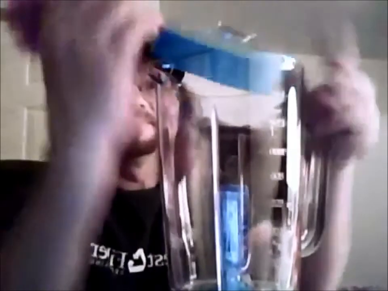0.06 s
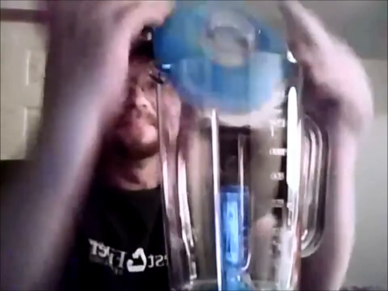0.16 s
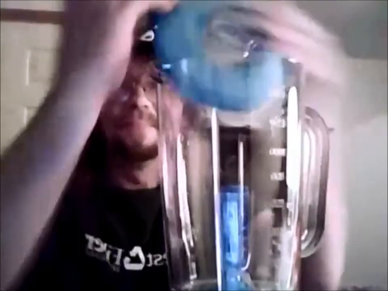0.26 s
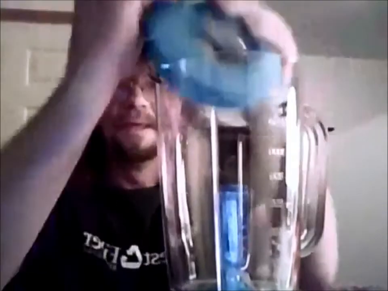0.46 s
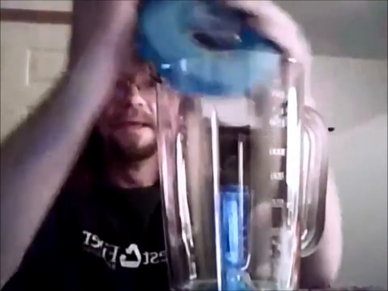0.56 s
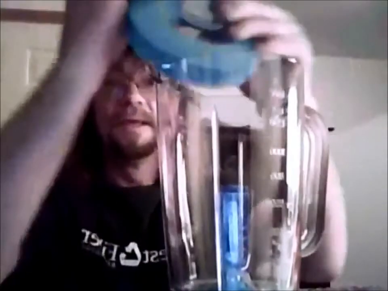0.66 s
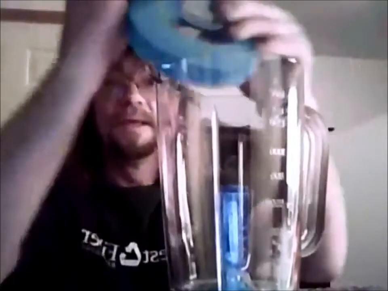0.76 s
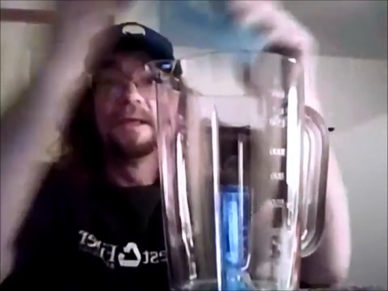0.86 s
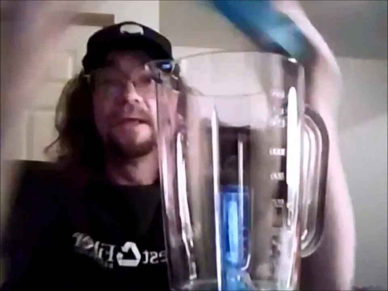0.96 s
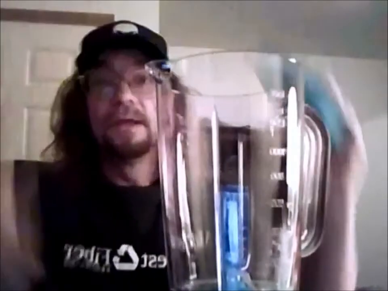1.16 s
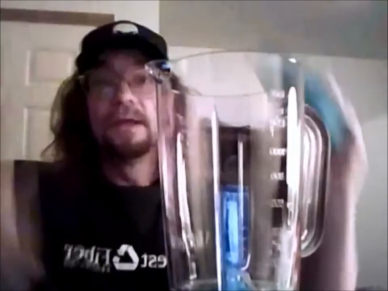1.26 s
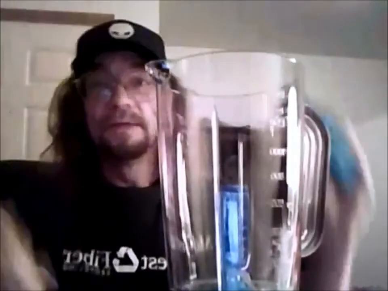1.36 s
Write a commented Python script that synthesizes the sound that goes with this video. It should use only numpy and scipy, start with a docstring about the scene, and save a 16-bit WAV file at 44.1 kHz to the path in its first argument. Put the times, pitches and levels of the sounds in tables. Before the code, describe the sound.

A plastic lid is pulled off a glass blender jar with clicks and a hollow thump.

```python
"""A light click and a faint rub sound over a low hum: a plastic lid is worked off a glass blender jar.
The seal slips by friction, then lets go with a crack and a hollow thump of the air inside.
The rim chatters over the glass, exciting its modes briefly, and taps it a few more times as it lifts.
The handling rumbles through the table, and the room adds a short reverberation to the close sound."""
import sys
import numpy as np
from scipy import signal
from scipy.fft import rfft, irfft, next_fast_len
from scipy.io import wavfile
from scipy.ndimage import uniform_filter1d

SR = 44100
rng = np.random.default_rng(int(sys.argv[2]) if len(sys.argv) > 2 else 0)


def wav_out(sig):
    """Save sig, one row per channel (or a flat mono array), as 16-bit PCM at SR to the path in sys.argv[1]."""
    wavfile.write(sys.argv[1], SR, np.round(np.clip(np.atleast_2d(sig).T, -1, 1) * 32767).astype(np.int16))


N = 61739
FFT_SIZE = next_fast_len(2 * N)
FREQS = np.fft.rfftfreq(FFT_SIZE, 1 / SR)
T = np.arange(N) / SR

# Partials of the hum. Each row: frequency in Hz, rms level in dB.
HUM_PARTIALS = [(78.5, -55.5), (119.5, -64), (240, -67.5), (360, -70)]
# Spectrum of the room noise. Each row: frequency in Hz, relative density in dB.
NOISE_SPECTRUM = [(20, -7.5), (32, -7), (52, -11.5), (80, -13), (130, -8), (200, -11), (300, -21),
                  (600, -19), (900, -28), (2400, -34.5), (4500, -42), (10400, -53.5), (12000, -71)]
# Hard contacts of lid and jar. Each row: start in seconds, relative levels of clack and snap in dB,
# cut-off in Hz (lower for a softer contact).
CONTACTS = [(.001, -42, -37.5, 5000), (.101, -45.5, -44, 4500), (.172, -47.5, -52, 6000),
            (.2025, -30.5, -35, 2800), (.209, -34, -35, 6000), (.219, -30, -37, 5000),
            (.256, -46, -39.5, 4000), (.3275, -21.5, -22.5, 11000), (0.3304, -13.5, -13, 7410),
            (.3335, -20.5, -17.5, 9000), (.3395, -28, -34.5, 9000), (.359, -37, -25.5, 8000),
            (.411, -37.5, -39, 6000), (.457, -22, -28.5, 9000), (.4587, -17.5, -22.5, 14000),
            (.4625, -28, -39, 9000), (.4685, -38, -50, 7000), (.4835, -28.5, -51, 4500),
            (.497, -21.5, -32, 6000), (.503, -23, -27, 9000), (.506, -22, -27, 7000),
            (.5145, -31.5, -29.5, 12000), (.517, -29, -29, 7000), (.532, -24.5, -34, 5000),
            (0.5761, -30.5, -30, 4830), (0.6747, -30, -52, 2470), (.678, -32.5, -48.5, 2600),
            (.7105, -40, -45, 4500), (0.7804, -30, -36.5, 4800), (.790, -32, -38.5, 4000),
            (.810, -33.5, -42, 3500), (0.8224, -32, -44, 4000)]
# Spectra of the plastic's midrange clack and treble snap. Each row: frequency in Hz, relative level in dB.
CLACK_SPECTRUM = [(100, -37.5), (400, -16), (620, -14), (780, -4.5), (870, -8), (1000, -4), (1600, -6),
                  (2450, 2), (2950, -17), (4000, -26.5), (11000, -56.5)]
SNAP_SPECTRUM = [(300, -45.5), (1800, -10), (3200, 4.5), (5200, 2.5), (6500, -5.5), (8200, -5),
                 (10300, -12.5)]
# Slips of the seal. Each row: start in seconds, length in seconds, centre in Hz, relative level in dB.
SEAL_SLIPS = [(0.002, 0.14, 1940, -50), (0.091, 0.1, 1070, -44.5), (0.116, 0.025, 4267, -33),
              (0.119, .018, 2500, -35.5), (0.2018, 0.032, 650, -32), (.204, .024, 1974, -37),
              (.297, 0.024, 2500, -35), (.298, .02, 4700, -36), (0.49, 0.014, 2290, -30.5),
              (0.514, 0.021, 2470, -27.5), (0.516, 0.039, 5100, -52), (0.746, 0.028, 4260, -42),
              (0.754, 0.025, 2020, -34)]
# Modes of the jar. Each row: frequency in Hz, bandwidth in Hz, gain in dB.
JAR_MODES = [(385, 29, 14.5), (1005, 50, 5.5), (1153, 45, -2.5), (1403, 94, 7.5), (1841, 36, -2),
             (2050, 62, 1), (2260, 55, 1), (2504, 17, 1), (3250, 70, -4), (3970, 80, -17), (5085, 60, 3.5),
             (5730, 50, -2)]
# Reverberation of the room. Each row: frequency in Hz, time to fall 60 dB (T60) in seconds.
ROOM_DECAY = [(150, .4), (1000, 0.4), (2500, 0.24), (5000, .36), (10000, .28)]
# Shakes of the jar on the table. Each row: start in seconds, length in seconds, level in dB.
TABLE_SHAKES = [(0.058, 0.067, -43), (.21, 0.12, -47), (0.356, 0.062, -34.5)]
# Spectrum of their rumble. Each row: frequency in Hz, relative level in dB.
RUMBLE_SPECTRUM = [(15, -10), (30, -3), (55, -11.5), (90, 1), (170, -2), (260, -10), (600, -52.5)]
# Soft knocks as the lid comes free. Each row: start in seconds, levels of thump, air and lid flex in dB.
TUGS = [(.098, -41, -48, -59), (0.12, -49.5, -40, -64), (0.2022, -44.5, -29.5, -27.5),
        (0.22, -34, -32, -47), (.266, -35.5, -35, -59.5), (0.329, -17.5, -15.5, -22.5),
        (.364, -27.5, -25.5, -45), (0.516, -39, -53, -64), (.711, -44, -40.5, -42.5),
        (0.834, -44, -62, -60)]
# Mode pairs of thump, air and lid flex, in the order of the pitches below.
# Each row: gain in dB, T60 in seconds, attack time in seconds.
THUMP_MODES = [(1, 0.16, 0.0038), (-14.5, 0.24, 0.013)]
AIR_MODES = [(3, 0.071, 0.0042), (-8.5, .07, 0.0032)]
FLEX_MODES = [(0, .05, 0.001094), (-8, 0.018, 0.00107)]
THUMP_HZ, AIR_HZ, FLEX_HZ = (130, 161), (390, 438), (590, 700)


def amp(db):
    """Amplitude ratio of a level in decibels."""
    return 10 ** (np.asarray(db) / 20)


def unit(x):
    """Normalisation to an rms of 1."""
    return x / np.sqrt(np.mean(np.abs(x) ** 2) + 1e-20)


def along(points, hz):
    """Interpolation of (Hz, value) points on a logarithmic frequency axis."""
    freqs, values = np.transpose(points)
    return np.interp(np.log(hz + 1), np.log(freqs + 1), values)


def filtered(x, response):
    """Convolution, as the product of a spectrum and a frequency response."""
    return irfft(rfft(x, FFT_SIZE) * response, FFT_SIZE)[:N]


def colour(points):
    """Minimum-phase response of unit power, shaped by (Hz, dB) points."""
    cepstrum = irfft(np.log(amp(along(points, FREQS))), FFT_SIZE)
    cepstrum[1:FFT_SIZE // 2] *= 2
    cepstrum[FFT_SIZE // 2 + 1:] = 0
    return unit(np.exp(rfft(cepstrum, FFT_SIZE)))


def resonance(hz, width):
    """Response of a damped oscillator, 1 at its natural frequency."""
    return 1j * FREQS * width / (hz * hz - FREQS ** 2 + 1j * FREQS * width)


def add(track, start, x):
    """Superposition of x on the track from a start in seconds."""
    i = max(0, round(start * SR))
    track[i:i + len(x)] += x[:N - i]


def swell(start, length):
    """Half-sine envelope: one rise and fall."""
    return np.sin(np.pi * np.clip((T - start) / length, 0, 1))


def background():
    """Superposition of steady low partials and dull broadband room noise."""
    hum = sum(amp(db) * np.sqrt(2) * np.sin(2 * np.pi * (hz * T + rng.random()))
              for hz, db in HUM_PARTIALS)
    noise = unit(filtered(rng.standard_normal(FFT_SIZE), colour(NOISE_SPECTRUM)))
    return hum + amp(-54) * noise


def impact(chatter_t60_s=0.021, early_t60_s=0.07):
    """Impulsive excitation: a blow, brief chatter and early reflections that differ for each contact."""
    t = T[:SR // 8]
    chatter = rng.standard_normal(len(t)) * amp(-60 * t / chatter_t60_s)
    force = amp(6.5) * chatter / np.linalg.norm(chatter)
    force[0] += 1  # the blow itself
    early = rng.standard_normal(len(t)) * amp(-60 * t / early_t60_s)
    early *= 1 - np.exp(-t / 0.0048)  # reflections from table and body build up
    excitation = force / np.linalg.norm(force) + amp(-7.5) * early / np.linalg.norm(early)
    return np.sqrt(0.004 * SR) * excitation  # the energy of about 4 ms at rms 1


def lid_clicks():
    """Impacts sound the plastic; the compliance of each contact acts as a low-pass filter."""
    clicks = np.zeros(N)
    clack_colour, snap_colour = colour(CLACK_SPECTRUM), colour(SNAP_SPECTRUM)
    for start, clack_db, snap_db, cutoff_hz in CONTACTS:
        lowpass = 1 / (1 + 1j * np.sqrt(2) * FREQS / cutoff_hz - (FREQS / cutoff_hz) ** 2)
        clack = amp(clack_db) * filtered(impact(), clack_colour * lowpass)
        snap = amp(snap_db) * filtered(impact(), snap_colour * lowpass)
        add(clicks, start, clack + snap)
    return clicks


def seal_rubs(graininess=0.4):
    """Sliding friction of seal on glass gives a band of gritty noise with a faint, broad hiss."""
    rubs = np.zeros(N)
    for start, length, hz, db in SEAL_SLIPS:
        noise = rng.standard_normal(N)
        roughness = unit(uniform_filter1d(rng.standard_normal(N), size=24))
        grit = unit(noise * np.exp(graininess * roughness))
        band = resonance(hz, width=0.5 * hz) ** 2
        hiss = amp(-29.5) * resonance(2 * hz, width=2 * hz)
        rubs += amp(db) * swell(start, length) * unit(filtered(grit, band + hiss))
    return rubs


def jar_ring(plastic):
    """Modal resonance: the glass rings in response to the plastic, whose own sound also passes."""
    modes = sum(amp(db) * resonance(hz, width) for hz, width, db in JAR_MODES)
    return filtered(plastic, 1 + modes)


def reverberation(x):
    """A diffuse field decays exponentially, somewhat sooner in the treble."""
    hz, t, spectra = signal.stft(rng.standard_normal(SR // 2), SR, nperseg=256)
    decay = amp(-60 * t / along(ROOM_DECAY, hz)[:, None])
    _, tail = signal.istft(spectra * decay, SR, nperseg=256)
    return amp(-9.5) * filtered(x, rfft(tail / np.linalg.norm(tail), FFT_SIZE))


def table_rumble():
    """Structure-borne sound: the jar shakes the table while the hands pull."""
    envelope = sum(amp(db) * swell(start, length) for start, length, db in TABLE_SHAKES)
    return envelope * unit(filtered(rng.standard_normal(N), colour(RUMBLE_SPECTRUM)))


def soft_knocks():
    """Damped free vibration: each tug thumps the jar, rings the air inside and flexes the lid."""
    knocks = np.zeros(N)
    resonators = (THUMP_HZ, THUMP_MODES), (AIR_HZ, AIR_MODES), (FLEX_HZ, FLEX_MODES)
    for start, *levels_db in TUGS:
        for db, (pitches, modes) in zip(levels_db, resonators):
            for hz, (mode_db, t60, attack) in zip(pitches, modes):
                envelope = amp(db + mode_db - 60 * T / t60) * (1 - np.exp(-T / attack))
                add(knocks, start, envelope * np.sin(2 * np.pi * hz * T))
    return knocks


def scene():
    """Direct and reverberant sound add at the microphone; the knocks mostly arrive directly."""
    lid_on_glass = amp(-9.5) * jar_ring(lid_clicks() + seal_rubs())
    knocks = soft_knocks()
    room = reverberation(lid_on_glass + amp(-12) * knocks)
    return (lid_on_glass + knocks + room + table_rumble() + background())[None]


def record(dry, cutoff_hz=10400):
    """Band limiting: the microphone acts as a steep low-pass filter."""
    lowpass = 1 / np.sqrt(1 + (FREQS / cutoff_hz) ** 140)
    return filtered(dry[0], lowpass)[None]


dry = scene()
out = record(dry)
wav_out(out)
```